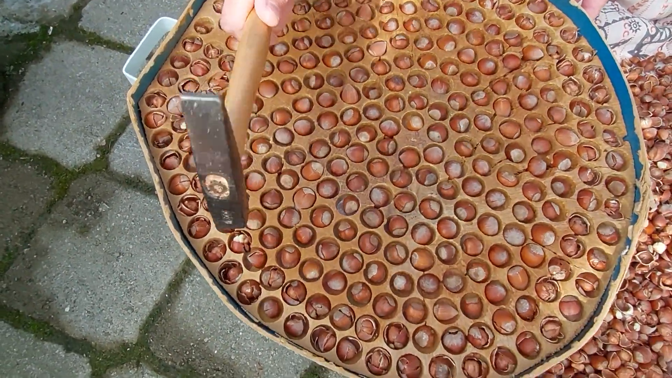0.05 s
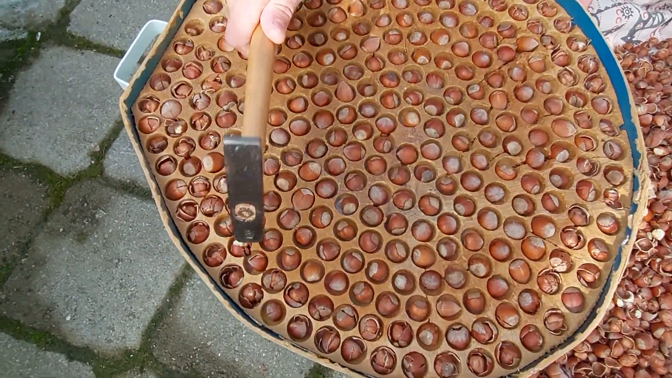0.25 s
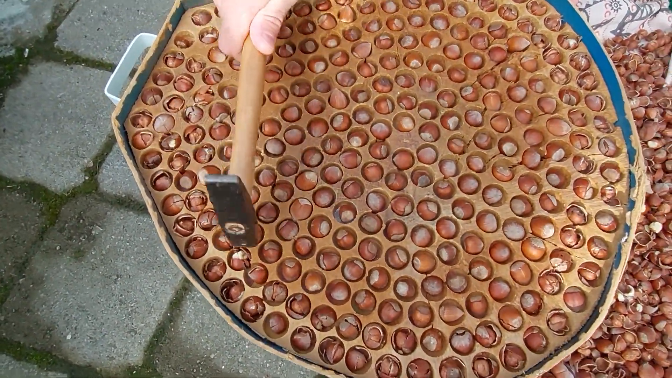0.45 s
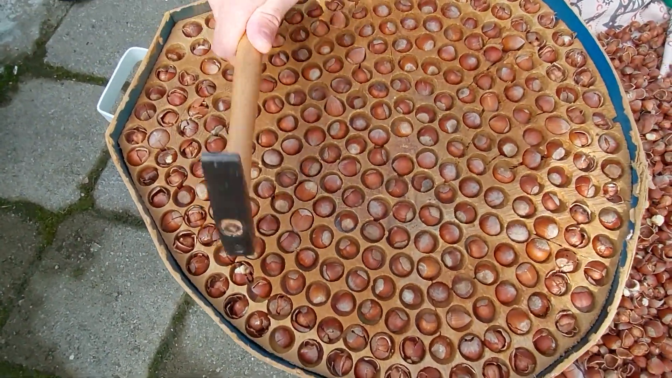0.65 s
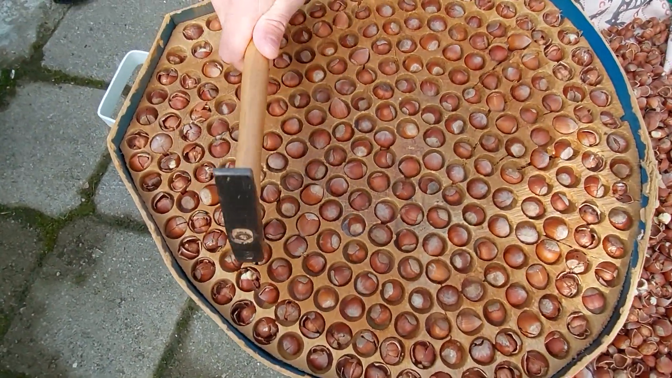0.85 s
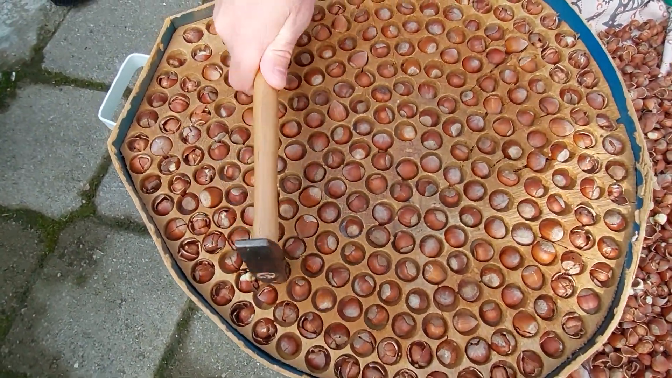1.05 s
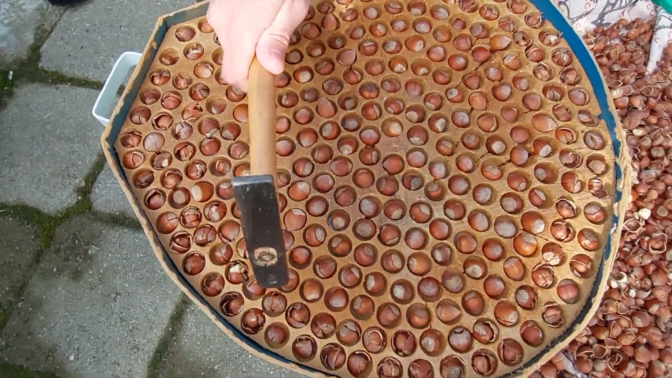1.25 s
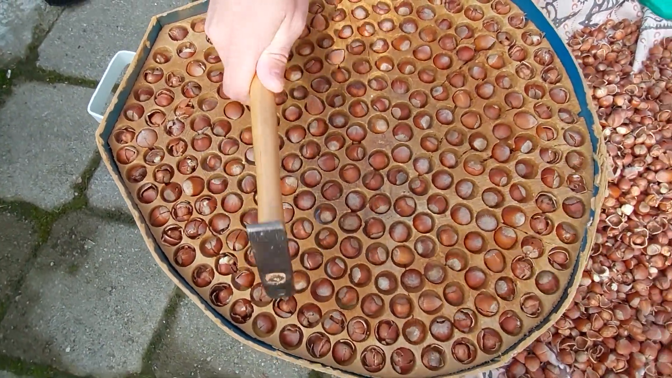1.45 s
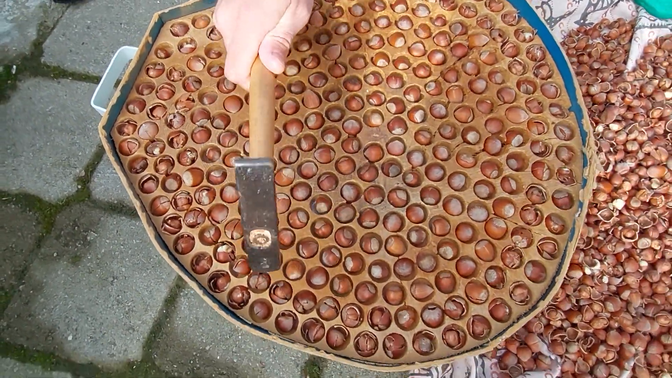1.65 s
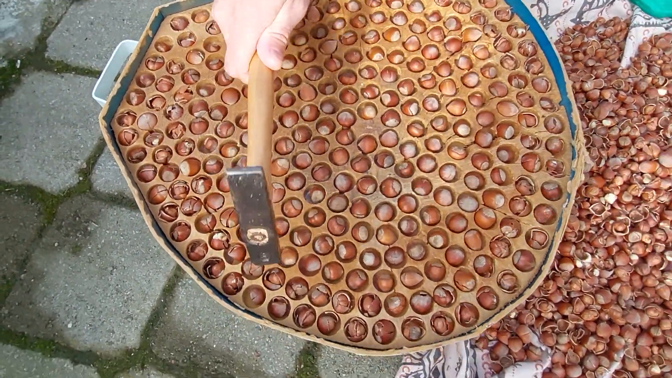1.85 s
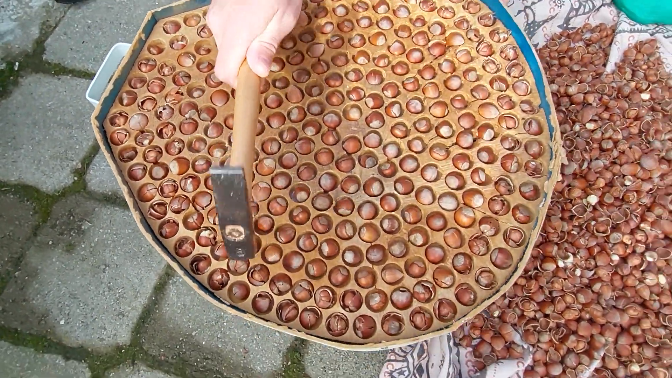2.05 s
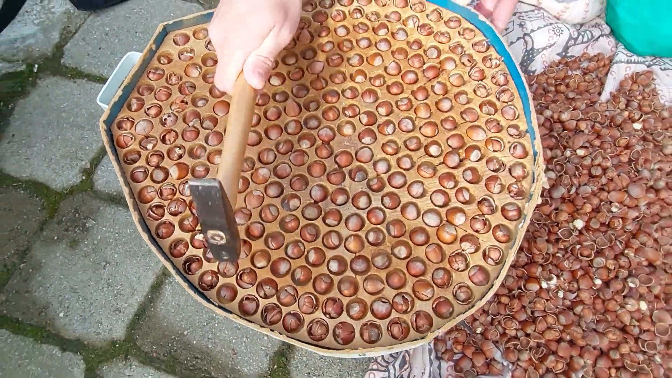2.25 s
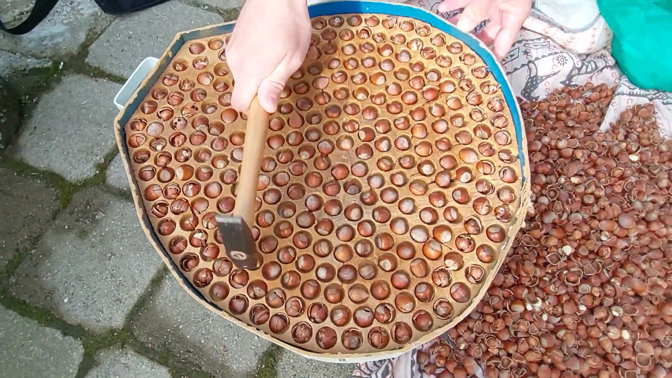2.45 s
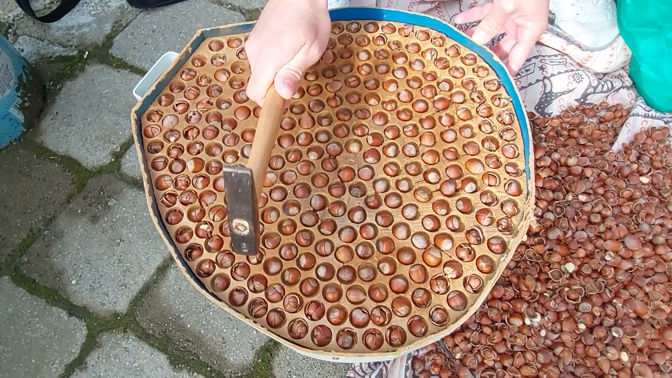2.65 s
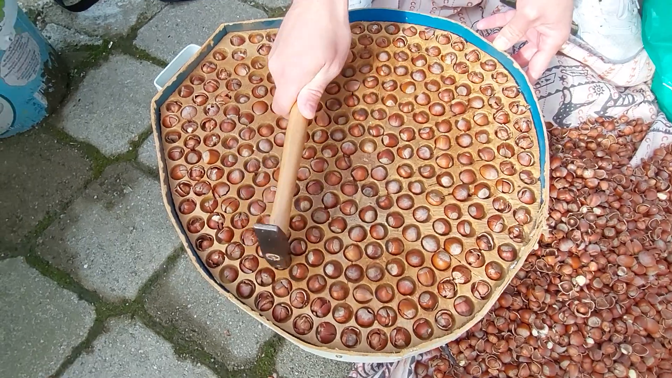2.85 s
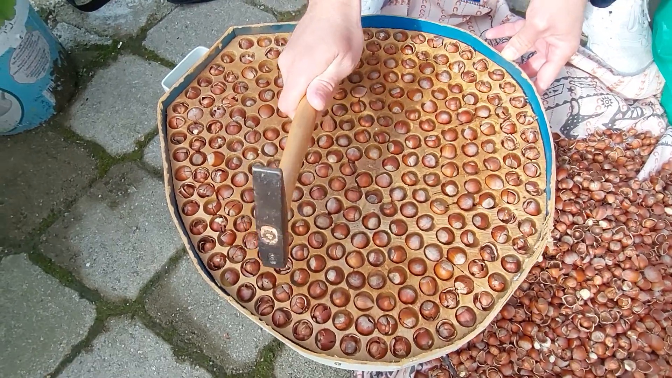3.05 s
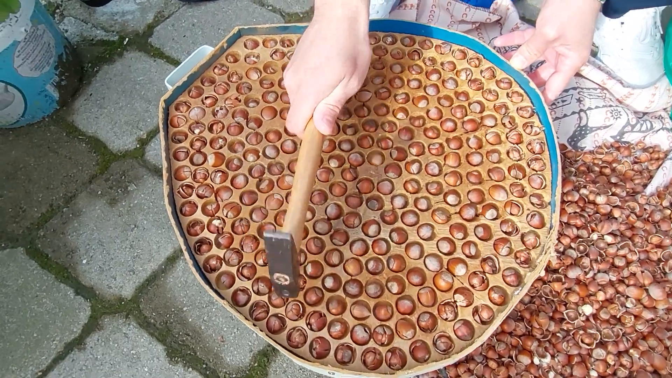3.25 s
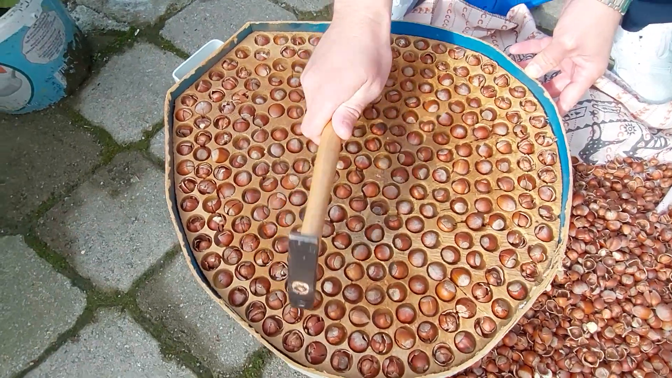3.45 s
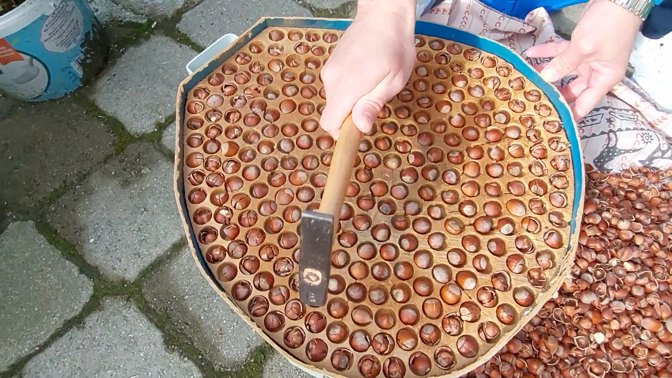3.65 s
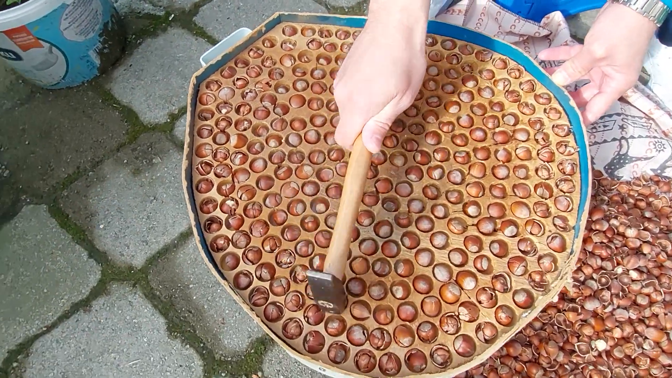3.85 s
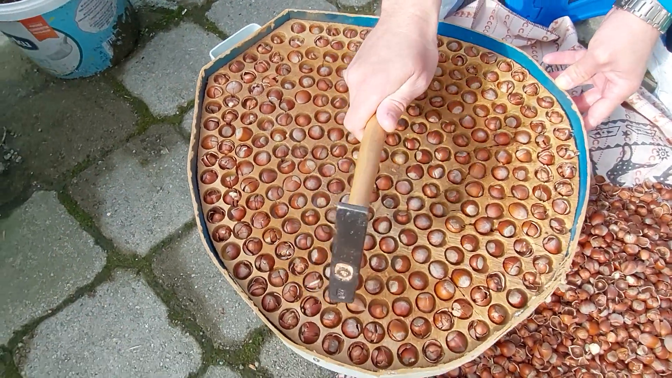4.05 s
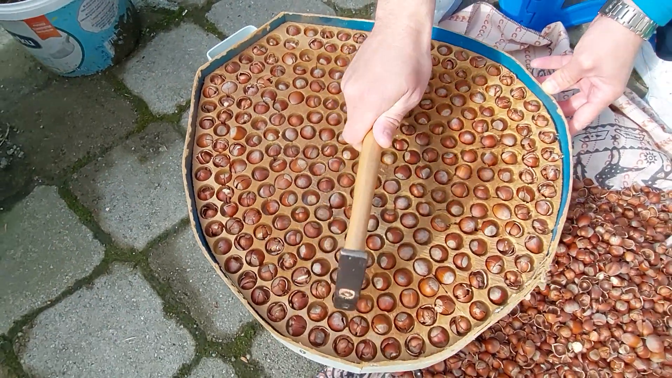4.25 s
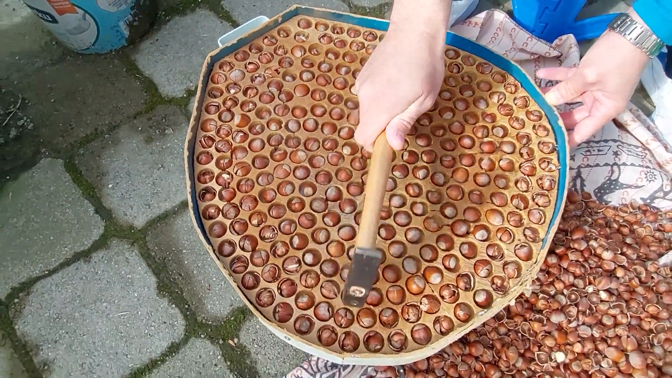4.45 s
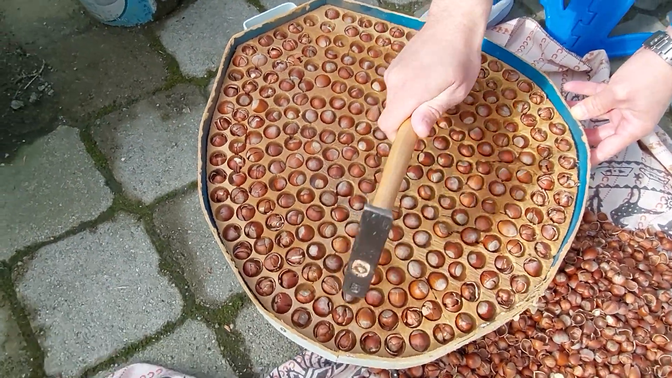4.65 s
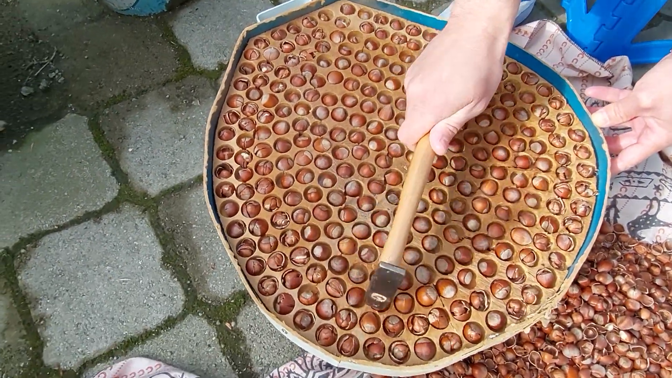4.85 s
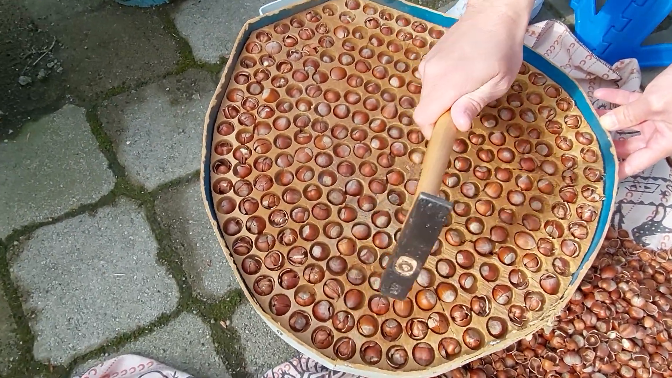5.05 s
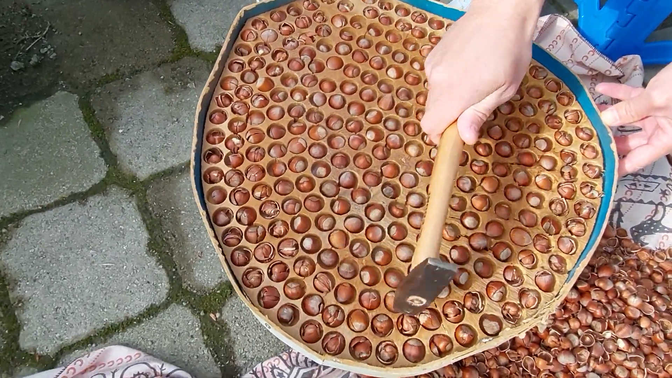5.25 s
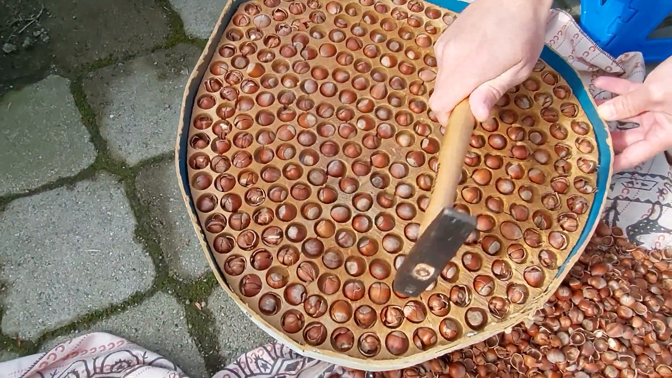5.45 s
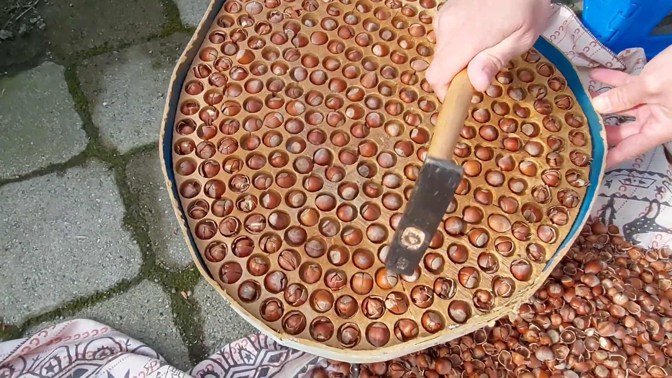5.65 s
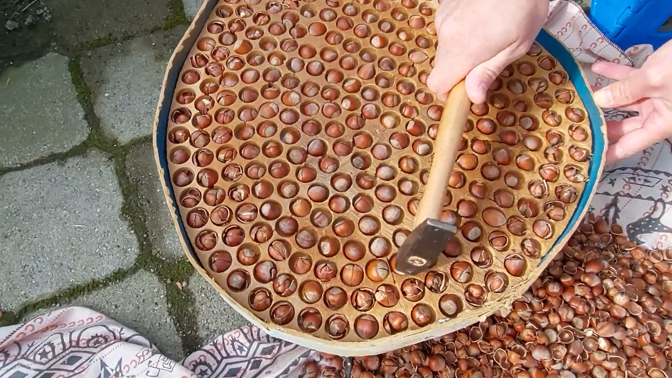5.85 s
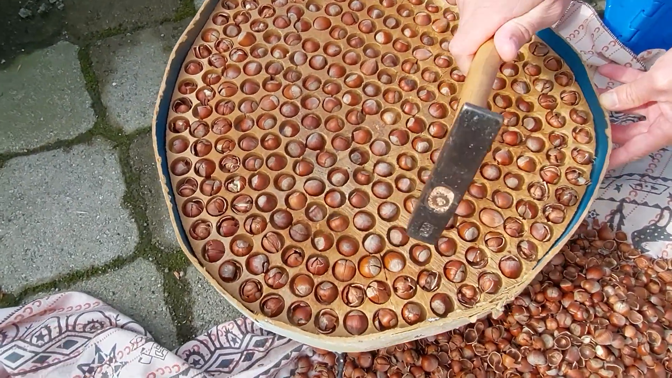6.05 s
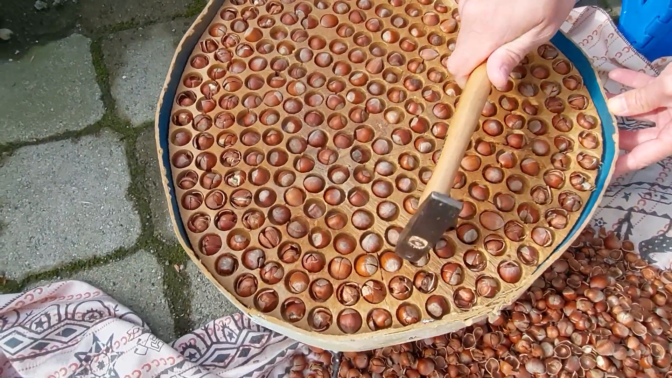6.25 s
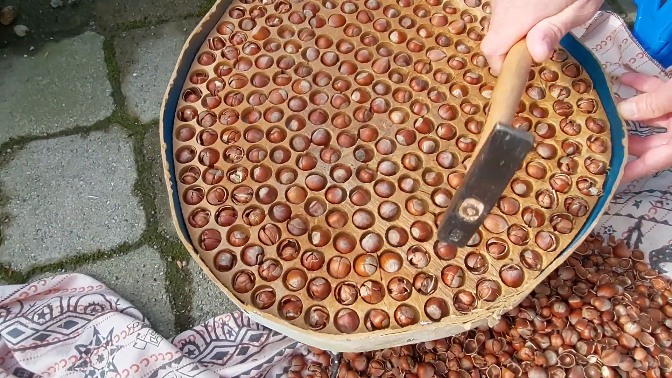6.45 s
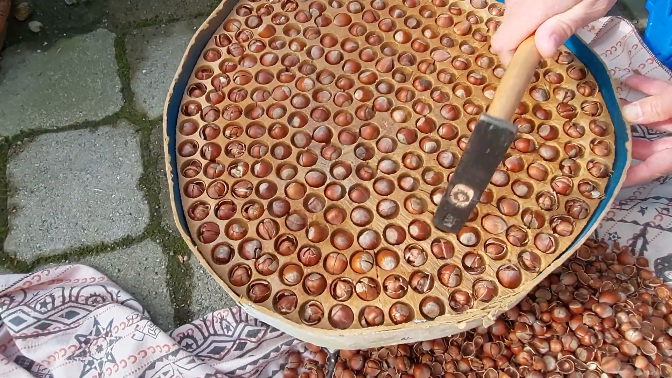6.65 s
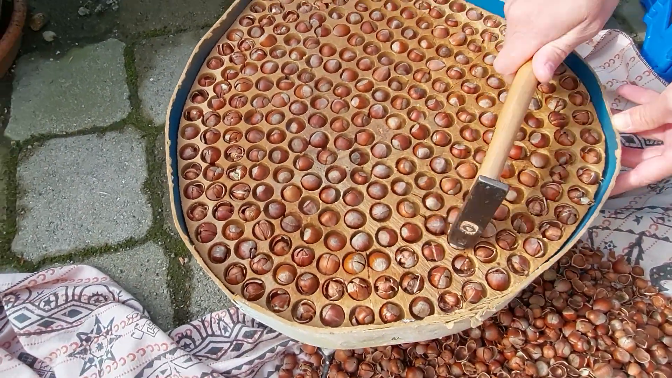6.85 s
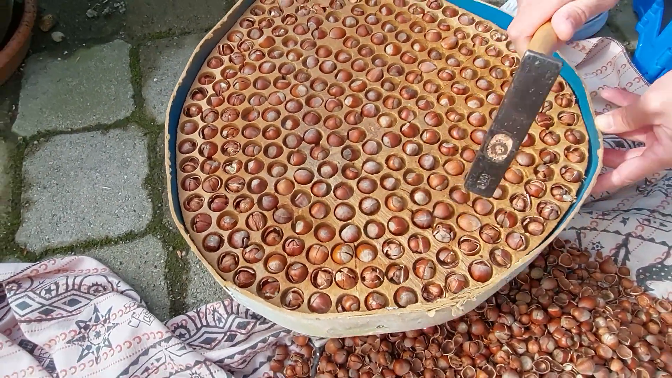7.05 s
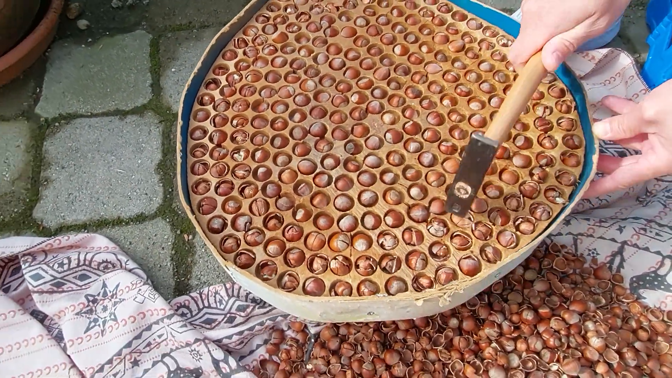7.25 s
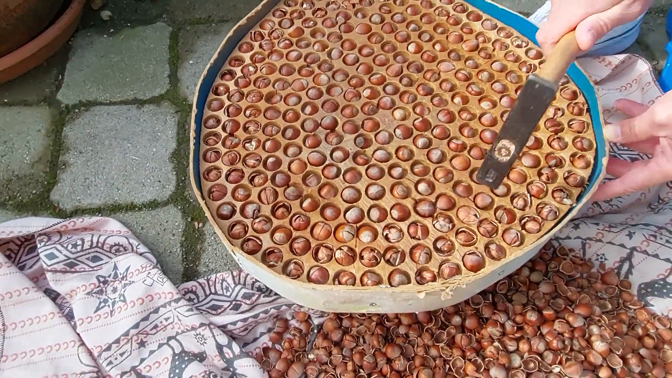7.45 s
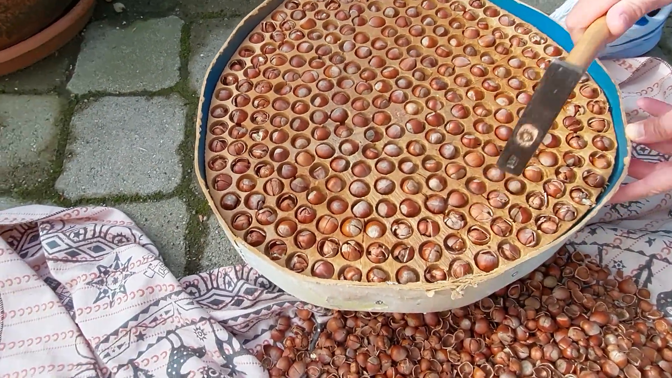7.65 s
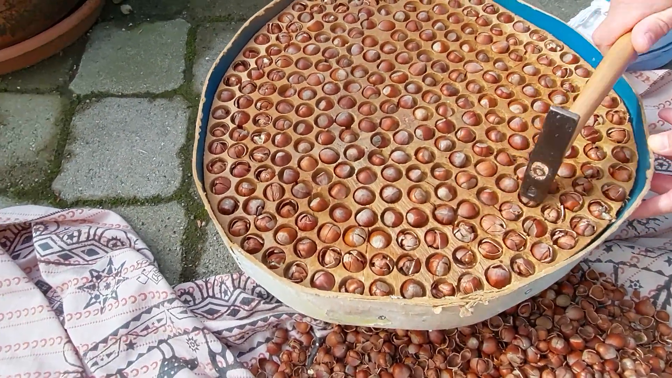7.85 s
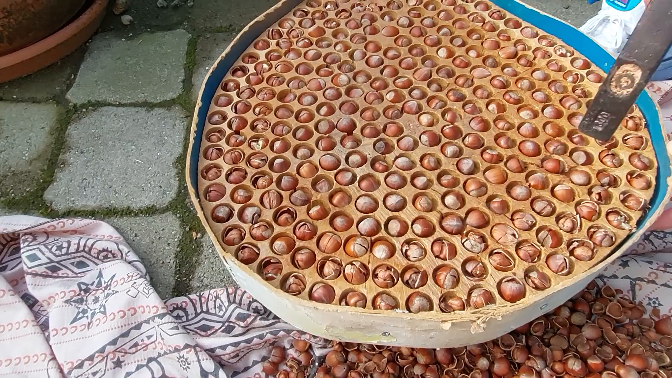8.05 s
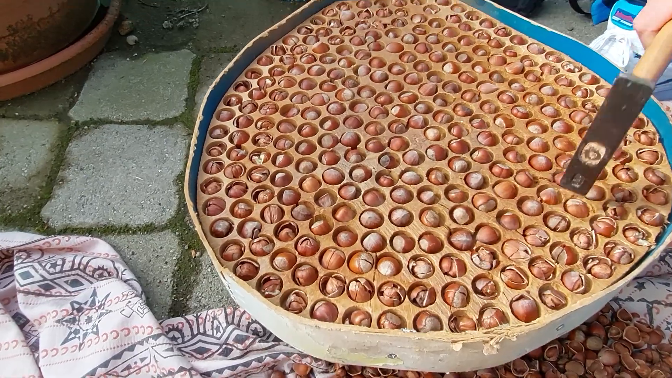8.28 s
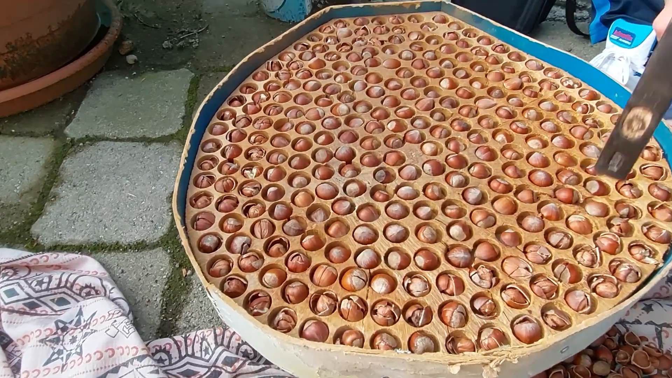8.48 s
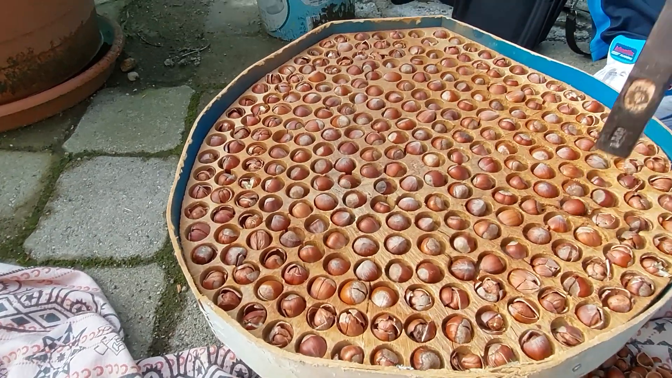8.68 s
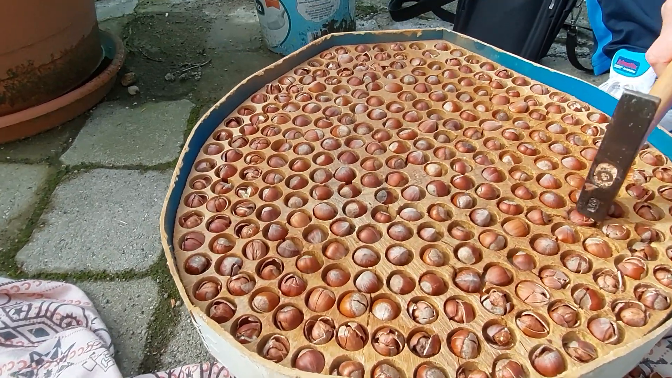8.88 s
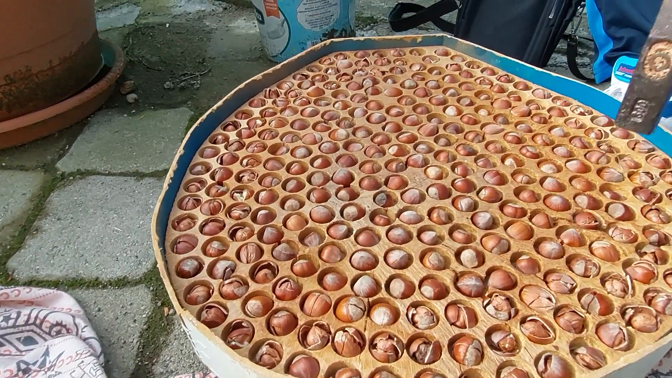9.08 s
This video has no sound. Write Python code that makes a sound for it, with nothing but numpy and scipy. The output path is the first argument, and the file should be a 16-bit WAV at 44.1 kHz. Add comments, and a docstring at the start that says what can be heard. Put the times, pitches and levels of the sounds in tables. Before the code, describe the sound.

Close up in a paved yard, a hammer breaks hazelnuts held in a wooden board on a plastic tub. A knock lands at 0 s, then a duller, softer one at 0.43 s with a tiny rebound. From 0.77 s sharp dry cracks follow about every third of a second until 8.95 s, varying in brightness; those at 1.4 and 1.8 s are more knocking. Each brings a short woody knock, a light rattle of neighbouring nuts and ticking crumbs. Deeper tub thumps show around 1.1, 5.6 and 5.9 s. Soft lumpy shoves of the tub occur near 0.1, 1.9, 2.5-3.3, 5-5.4 and 7.6-8 s. Extra shell ticks fall around 1.4-2.4 and 4 s. Short wall echoes answer, over faint hush, hiss and low rumble. Very faint distant squeaks sound at 0.5 and 1.4 s. The blows drift slightly rightward.

```python
"""Sharp cracks, about three a second: a steel hammer breaks hazelnuts in the holes of a wooden board on a plastic tub.
A shell breaks in two quick bursts of noise with its own resonance; damped modes knock the board and thump the tub.
The other nuts rattle as short damped notes, bits of shell tick, and shoves jostle the tub in soft, lumpy noise.
A paved yard answers close by with noise tails and smeared wall echoes.
Behind it lie a faint hush and hiss over a low rumble, and two thin squeaks far away."""
import sys
import numpy as np
from scipy import signal
from scipy.fft import rfft, irfft, next_fast_len
from scipy.io import wavfile
from scipy.ndimage import uniform_filter1d, map_coordinates

SR = 44100
rng = np.random.default_rng(int(sys.argv[2]) if len(sys.argv) > 2 else 0)


def to_wav(sig):
    """Store sig (one row per channel, or 1-D mono) as 16-bit WAV at the path in sys.argv[1].

    Samples outside -1..1 are clipped; the rate is SR.
    """
    pcm = np.clip(np.atleast_2d(sig), -1, 1) * 32767
    pcm = np.round(pcm).astype(np.int16)
    wavfile.write(sys.argv[1], SR, pcm.T)  # frames by channels


N = 402191

SIZE = 32768  # samples in one short sound
AGE = np.arange(SIZE) / SR  # s
HZ = np.fft.rfftfreq(SIZE, 1 / SR)
LEAD = 256 / SR  # s of room ahead of the blow in a short sound
WINDOW = .01  # s, reference length for the level of a short sound

# Hammer blows, and one light rebound at 0.4546 s, levels ahead of each layer's trim: (start_s, crack_db,
# body_db re crack, brightness_db re crack, shell_resonance_hz, board_knock_db, board_pitch_hz, tub_thump_db)
BLOWS = [(-0.014, -27, -1, 3, 5000, -15.5, 497, -37), (0.4298, -26, -16.5, -9, 7040, -18.5, 387, -44),
         (0.4546, -30, -22.5, -24.5, 5160, -31, 414, -49),
         (0.7725, -17.5, -10.5, -8, 3950, -24, 575, -36.5),
         (1.0993, -18, -7.5, -6.5, 7150, -25.5, 450, -17), (1.411, -24, -6, 0, 9900, -14, 396, -40),
         (1.7946, -24, -6.5, 1, 10160, -11, 392, -24), (2.1792, -16, -13, -3.5, 4390, -27.5, 493, -60.5),
         (2.545, -21, -8, -5, 4430, -39, 566, -44.5), (2.8923, -21.5, 3, -3, 4050, -21.5, 442, -39),
         (3.2285, -19.5, -9.5, -2, 4110, -32.5, 622, -38), (3.5668, -22.5, -6, -1, 4490, -25.5, 494, -52.5),
         (3.9091, -22, -8, -0.5, 4620, -31.5, 403, -41.5),
         (4.2343, -19.5, -10, -3.5, 4140, -30.5, 519, -41.5), (4.5522, -19, 2, -5, 4460, -16, 428, -51),
         (4.9083, -19.5, -12.5, -5.5, 3790, -30.5, 424, -40),
         (5.2471, -20, -5.5, -3, 6840, -31.5, 484, -34), (5.5676, -17, -7, -4, 3080, -28, 331.5, -17.5),
         (5.92, -19, -6, -2, 6060, -23.5, 330, -10), (6.2552, -19, -8.5, -5.5, 5630, -17.5, 454, -44),
         (6.5863, -19.5, -9, -4, 7540, -35.5, 472, -38.5),
         (6.9186, -21.5, -8.5, -2.5, 4560, -31, 554, -26.5), (7.2469, -21, -7.5, -4, 3860, -32.5, 635, -40),
         (7.5743, -19, -8, -5.5, 7420, -44.5, 379, -33), (7.9052, -20.5, -9.5, -5.5, 7140, -39.5, 542, -26),
         (8.25, -19.5, -2, -5.5, 3600, -18.5, 444, -38.5), (8.5985, -20, -9.5, -3, 3540, -27.5, 401, -41),
         (8.948, -18, -10.5, -7, 6180, -34, 365, -29)]
# Tone of shell fragments: (frequency_hz, gain_db)
CRUMB_COLOUR = [(300, -13), (1200, 5), (3000, 3), (5500, 5.5), (7300, -0.5), (8400, -10), (15500, -13.5)]


def hammer(crack_gain_db=-2.5, knock_gain_db=-1, thump_gain_db=-3, crumb_db=-21, radiated_db=2.5, knock_radiated_db=-4):
    """Most blows crack a shell and scatter crumbs, a few are soft knocks or a rebound; all knock board and tub."""
    second_s, second_scatter = .0021, 0.26  # delay of the second fracture, its relative scatter
    second_db, second_spread_db = -7.5, 2  # re the first fracture
    # A crack with more hollow body carries further into the yard
    throw_base_db, throw_per_body = 2, 0.2  # dB, dB per dB of body
    yard_fall_db_per_s = 0.13  # the yard's answer fades as the listening point moves round
    out = np.zeros((2, N))
    at_blow = np.exp(-2j * np.pi * HZ * LEAD)  # delays a sound to the moment of the blow
    chance = rng.standard_normal((len(BLOWS), 2))
    for blow, (late, strong) in zip(BLOWS, chance):
        s, crack_db, body_db, bright_db, shell_hz, knock_db, pitch_hz, thump_db = blow
        tone = amp(crack_db + crack_gain_db) * shell(body_db, bright_db)
        shell_ring = resonance(shell_hz, width_hz=340, db=3.5)
        fractures = snap(second_s * np.exp(second_scatter * late), second_db + second_spread_db * strong)
        crack = tone * fractures * causal(shell_ring)
        scatter = tone * amp(crumb_db) * at_blow * crumbs(count=12, mean_s=0.018, t60=.7)
        knock = -amp(knock_db + knock_gain_db) * rfft(board(pitch_hz)) * low_cut(hz=253)
        radiated = amp(radiated_db) * tone * at_blow + amp(knock_radiated_db) * knock
        throw_db = throw_base_db + throw_per_body * body_db - yard_fall_db_per_s * s
        add(out, s, in_yard(placed(s, crack + scatter + knock), radiated, throw_db))
        add(out, s, amp(thump_db + thump_gain_db) * tub())
    return out


def snap(second_s, second_db):
    """The spectrum of two quick fractures: even overall, with each shell's own peaks and dips."""
    x = rfft(fracture(0) + amp(second_db) * fracture(second_s))
    ripple_db = 3 * map_coordinates(rng.standard_normal(80), [HZ / 350], mode="mirror")
    x = x * causal(amp(ripple_db))
    trend = uniform_filter1d(np.mean(np.abs(x) ** 2, 0), size=2400)
    # dividing by the broad trend leaves only the fine structure
    return x * causal(1 / np.sqrt(np.abs(trend) + 1e-12))


def fracture(after, splinter_db=-13):
    """One break of a shell: a sharp noise spike, then a few milliseconds of splintering."""
    spike = pair(0.5, SIZE) * strike(rise=0.0023, t60=0.0032, after=after)
    splinters = pair(0.6, SIZE) * strike(rise=0.0066, t60=0.02, after=after)
    return spike + amp(splinter_db) * splinters


def shell(body_db, bright_db):
    """The tone of one nut: a hollow body and a bright edge, each balanced against the middle band."""
    # Crack tone ahead of the balance: (frequency_hz, gain_db)
    crack_colour = [(100, -14.5), (400, 6.5), (800, 7), (1400, 4), (2200, 2.5), (4000, 4), (6000, 4),
                    (7500, 6.5), (8300, -14), (11000, -10.5), (15500, -12.5), (17000, -27.5)]
    colour = amp(along(crack_colour, HZ))
    power = colour ** 2 * 2 / (SIZE * WINDOW * SR)

    def band_db(low_hz, high_hz):
        return 10 * np.log10(power[(HZ > low_hz) & (HZ < high_hz)].sum())

    body = body_db - band_db(750, 2000)
    middle = -band_db(2000, 7800)
    top = bright_db - band_db(8000, 16000)
    balance = [(1900, body), (3000, middle), (7600, middle), (8300, top)]
    return causal(colour * amp(along(balance, HZ)))


def crumbs(count, mean_s, t60):
    """The spectrum of shell crumbs that scatter over the board: short noise grains at random waits."""
    wait, size = rng.exponential(size=(2, count))
    when = np.clip(0.01 + mean_s * wait, 0, .5)
    kick_db = 6 * np.minimum(size, 3) - 60 * when / t60
    kicks = np.bincount((when * SR).astype(int), amp(kick_db), SIZE)
    grain = pair(0.9, SIZE) * amp(-60 * AGE / 0.011)
    kicks_spectrum = rfft(kicks / np.linalg.norm(kicks))
    grain_spectrum = rfft(grain / np.linalg.norm(grain[0]))
    return kicks_spectrum * grain_spectrum * amp(along(CRUMB_COLOUR, HZ))


def board(pitch_hz):
    """The board's knock: damped modes, with new strengths and slight detuning at every spot."""
    # Modes of the board: (multiple_of_pitch, level_db, t60_s)
    modes = [(.64, -29, 0.1), (0.782, -13, 0.039), (.92, 0.5, 0.041), (1.0, 15, 0.05), (1.163, -1, 0.11),
             (1.399, -13.5, 0.08), (1.6, -1, 0.096), (1.801, -8, 0.076), (2.148, -11.5, 0.1),
             (2.748, -14.5, 0.087), (4.202, -11, 0.1)]
    chance = rng.standard_normal((len(modes), 2))
    knock = 0
    for (multiple, db, t60), (strong, sharp) in zip(modes, chance):
        knock = knock + amp(db + 2 * strong) * ring(pitch_hz * multiple * (1 + 0.032 * sharp), t60)
    return burst(knock)


def tub(hz=59, t60=0.093, push_db=0):
    """The tub gives under the board: one dull push and a short boom that reaches the ears out of step."""
    boom = rfft(ring(hz, t60) + amp(push_db) * ring(hz=95, t60=0.021))
    skew = np.exp(1j * np.array([[.5], [-.5]]) * rng.standard_normal())
    return burst(irfft(boom * skew * low_cut(hz=42)))


def placed(s, spectrum):
    """A spectrum as the two ears get it from the hammer, which works its way from left to right."""
    # Hammer position: (time_s, right_ear_lead_ms, left_minus_right_db)
    place = [(0, -.13, 0), (2.9, -.08, 0), (4.5, -.03, -.3), (6, .05, -.6), (7.2, .14, -1.6),
             (9.1, .17, -1.6)]
    times, leads, pans = np.transpose(place)
    lead_s = np.interp(s, times, leads) / 1000
    pan_db = np.interp(s, times, pans)
    ears = np.array([[.5], [-.5]])
    return spectrum * amp(ears * pan_db) * np.exp(-2j * np.pi * HZ * ears * lead_s)


def rattle(count=9, flight_s=0.093, flight_scatter=0.33, db=-20, spread_db=3, fade_db_per_s=75,
           pitch_hz=4000, t60=0.015, click_db=-6):
    """Each blow or rebound makes the nuts jump in their holes; they drop back with small ticks, late ones softer."""
    rattle_fall_db_per_s = 1.43  # less rattle as the hammer nears the rim that a hand steadies
    out = np.zeros((2, N))
    t = AGE[:1024]
    for s, crack_db, *_ in BLOWS:
        jump_db = crack_db + db - rattle_fall_db_per_s * s
        for late, size, pitch, side in rng.standard_normal((count, 4)):
            flight = flight_s * np.exp(flight_scatter * late)
            note_hz = pitch_hz * np.exp(.13 * pitch)
            note = np.sin(2 * np.pi * note_hz * t) * amp(-60 * t / t60)
            click = amp(click_db - 60 * t / .012) * pair(.5, len(t))
            pan_db = side * np.array([[2], [-2]])
            level_db = jump_db + spread_db * size - fade_db_per_s * flight + pan_db
            # these sounds have no lead, so LEAD is added back
            add(out, min(s + LEAD + flight, N / SR), amp(level_db) * (note + click))
    return out


def bits(tick_db=-3, tap_db=-11):
    """Larger bits of shell and light hammer touches: a resonant noise tick and a light tap of the board's modes."""
    # Levels ahead of the two trims: (start_s, level_db, pitch_hz, low_knock_db re level)
    landings = [(1.424, -27.5, 4700, -19), (1.809, -27, 6000, -15), (1.8396, -34.5, 5400, 7),
                (1.8842, -43.5, 5600, 9), (2.4061, -48.5, 2650, 23), (3.9393, -36.5, 4060, 0.5),
                (4.0487, -42.5, 5650, 4.5), (4.0757, -32.5, 2880, -14.5), (4.283, -38, 5360, -32.5),
                (8.6348, -38.5, 5440, 6.5)]
    out = np.zeros((2, N))
    for s, db, hz, low_db in landings:
        colour = causal(amp(along(CRUMB_COLOUR, HZ)) * resonance(hz, width_hz=850, db=-3.5))
        noise = pair(0.15, SIZE) * strike(rise=.004, t60=0.073)
        tick = burst(irfft(rfft(noise) * colour))
        sound = rfft(tick + amp(low_db + tap_db) * board(pitch_hz=535))
        add(out, s, amp(db + tick_db) * in_yard(sound, sound))
    return out


def jostle(attack_s=.1, release_s=.14, lumps_per_s=30, lump_db=2.5, gain_db=0):
    """The tub shifts: low noise swells, holds and dies away with each shove, in soft, uneven bumps."""
    # Shoves, with attack_s and release_s the times of a 60 dB rise and fall: (start_s, length_s, level_db)
    shoves = [(0.068, 0.012, -34), (1.877, .12, -46.5), (2.52, 0.19, -43.5), (2.843, 0.25, -40),
              (3.267, 0.038, -46.5), (5.02, 0.345, -45), (7.589, 0.018, -35.5), (7.934, 0.099, -40)]
    boom_colour = [(20, -43.0), (50, -4.0), (80, 0), (120, -8.0), (200, -23), (500, -26.5), (2000, -72.5)]  # Hz, dB
    t = np.arange(N) / SR
    swell = 0
    for s, length, db in shoves:
        outside = np.maximum((s - t) / attack_s, (t - s - length) / release_s)
        swell = swell + amp(db - 60 * np.maximum(outside, 0))
    boom = filtered(pair(0.3, N), lambda hz: amp(along(boom_colour, hz)))
    return amp(gain_db + lump_db * waver(lumps_per_s)) * swell * unit(boom)


def in_yard(direct, radiated, throw_db=0, near_db=-13.5, yard_db=-24.5):
    """The direct sound, plus what is radiated all round: scatter from tub and paving, the yard's tail, its echoes."""
    # Decay times: (frequency_hz, t60_s)
    near_t60 = [(200, 0.22), (800, 0.12), (3000, 0.094), (8000, 0.093), (15000, 0.06)]
    yard_t60 = [(200, 1), (1000, 0.41), (4000, 0.76), (8000, 0.61), (15000, 0.37)]
    # Tones of the near scatter and of the yard's tail: (frequency_hz, gain_db)
    near_colour = [(150, 12), (500, 4.5), (1000, 4.5), (2000, 2.5), (4000, 1.5), (7400, -10.5), (8300, -14),
                   (15500, -1)]
    yard_colour = [(150, -6.5), (600, -2), (2000, 2.5), (4000, -4), (7400, -8.5), (8300, -6), (15500, -2)]
    near = amp(near_db) * tail(near_t60, near_colour, onset=0.0021)
    # the houses stand some way off, so their answer swells late
    far = amp(yard_db) * tail(yard_t60, yard_colour, onset=0.037) + walls()
    return irfft(direct + radiated * (near + amp(throw_db) * far))


def tail(t60s, colour, onset):
    """A diffuse stereo tail: noise that builds up over onset seconds and decays at its own rate in each band."""
    hz, t, z = signal.stft(rng.standard_normal((2, SIZE)), SR, nperseg=256)
    decay = amp(-60 * t / along(t60s, hz)[:, None])
    x = signal.istft(z * decay, SR, nperseg=256)[1][:, :SIZE]
    x = x * (1 - np.exp(-(AGE / onset) ** 2))
    return rfft(x / np.linalg.norm(x[0])) * amp(along(colour, HZ))


def walls(smear=0.0043):
    """The response of the yard's walls: each echo is noise, smeared over smear seconds by a rough face."""
    # Echoes: (delay_s, level_db)
    echoes = [(.048, -29.5), (.064, -38), (0.078, -31.5), (0.084, -36.5), (.123, -37), (0.152, -34.5),
              (0.221, -39.5)]
    # Tone of the echoes: (frequency_hz, gain_db)
    wall_colour = [(300, -16), (1700, -11), (2700, -2), (3800, 1), (5000, -7), (7400, -7), (8500, -18),
                   (15500, -18)]
    shape = sum(amp(db) * np.exp(-np.abs(AGE - delay) / smear) for delay, db in echoes)
    noise = rng.standard_normal((2, SIZE)) * shape / np.sqrt(smear * SR)
    return rfft(noise) * amp(along(wall_colour, HZ))


def squeaks():
    """Faint, wavering squeaks of something far away: narrow noise bands that swell and fade."""
    # Squeaks: (centre_s, length_s to 1/e on either side, pitch_hz, level_db)
    calls = [(0.513, .05, 2210, -65), (1.37, 0.033, 2154, -61)]
    t = np.arange(N) / SR

    def thin(pitch_hz):
        return unit(filtered(pair(.5, N), lambda hz: np.exp(-((hz - pitch_hz) / 70) ** 2)))

    return sum(amp(db) * np.exp(-((t - s) / length) ** 2) * thin(hz) for s, length, hz, db in calls)


def background(rumble_db=-3, hush_db=0, hiss_db=-12, rumble_grows=2.3, waver_db=2):
    """Outdoor hush and hiss over a low rumble: one level drives all three, the rumble most, and each wavers."""
    # Common level: (time_s, level_db)
    air = [(0.2, -60), (1.41, -61.5), (3.15, -56), (3.33, -60), (4.03, -57.5), (8.9, -58)]
    # Noise shapes: (frequency_hz, density_db per Hz, relative)
    rumble_shape = [(15, -37.5), (35, -15.5), (65, 4.5), (100, 4.5), (170, -13), (300, -25.5), (700, -61)]
    hush_shape = [(150, -9), (280, 1), (500, 3), (900, -6), (1500, -11), (2400, -13.5), (3500, -25),
                  (8000, -41)]
    hiss_shape = [(1200, -12.5), (2500, -3.5), (4000, -0.5), (5500, -8.5), (7500, -11.5), (8300, -24.5),
                  (11000, -20), (15500, -36)]
    level_db = np.interp(np.arange(N) / SR, *np.transpose(air))
    swell_db = level_db - level_db.mean()

    def noise(shape, alike):
        return unit(filtered(pair(alike, N), lambda hz: amp(along(shape, hz))))

    rumble = amp(rumble_db + rumble_grows * swell_db + 3 * waver(5.6)) * noise(rumble_shape, 0.18)
    hush = amp(hush_db + swell_db + waver_db * waver(7.9)) * noise(hush_shape, 0.23)
    hiss = amp(hiss_db + swell_db + 0.9 * waver(6)) * noise(hiss_shape, 0.17)
    return amp(level_db.mean()) * (rumble + hush + hiss)


def amp(db):
    """Decibels to gain."""
    return np.exp(np.maximum(db, -300) * np.log(10) / 20)


def unit(x):
    """x at rms 1."""
    return x / np.sqrt(np.mean(x ** 2) + 1e-20)


def burst(x):
    """A short sound scaled as if all its energy made rms 1 over WINDOW seconds."""
    energy = np.mean(np.sum(x ** 2, -1))
    return x / np.sqrt(energy / (WINDOW * SR) + 1e-20)


def along(points, hz):
    """(Hz, value) points joined on a log frequency axis."""
    f, v = np.transpose(points)
    return np.interp(np.log(hz + 1), np.log(f + 1), v)


def causal(gain):
    """The minimum-phase response with this gain: it rings only after it is struck."""
    cepstrum = irfft(np.log(np.maximum(gain, 1e-6)))
    cepstrum[1:SIZE // 2] *= 2
    cepstrum[SIZE // 2 + 1:] = 0
    return np.exp(rfft(cepstrum))


def filtered(x, gain):
    """A whole track times a gain of frequency."""
    m = next_fast_len(N + SIZE)
    return irfft(rfft(x, m) * gain(np.fft.rfftfreq(m, 1 / SR)), m)[..., :N]


def add(track, s, sound):
    """Mix in a sound whose onset, LEAD into it, falls at time s."""
    start = round((s - LEAD) * SR)
    a, b = max(start, 0), min(start + sound.shape[-1], N)
    track[:, a:b] += sound[..., a - start:b - start]


def strike(rise, t60, after=0):
    """An envelope that climbs 60 dB in rise seconds and falls 60 dB in t60, its peak after seconds past the blow."""
    t = AGE - LEAD - after
    return amp(-60 * np.maximum(-t / rise, t / t60))


def ring(hz, t60):
    """A damped mode that starts at the blow."""
    t = np.maximum(AGE - LEAD, 0)
    return np.sin(2 * np.pi * hz * t) * amp(-60 * t / t60)


def resonance(hz, width_hz, db):
    """The gain of a resonant bump on top of a flat response."""
    return 1 + amp(db) / np.sqrt(1 + (2 * (HZ - hz) / width_hz) ** 2)


def low_cut(hz):
    """A small body radiates little below this frequency: a two-pole high-pass."""
    return (1j * HZ / (hz + 1j * HZ)) ** 2


def pair(alike, size):
    """Two noises with the given correlation, from one shared noise and two of their own."""
    own = rng.standard_normal((3, size))
    alike = np.clip(alike, 0, 1)
    return np.sqrt(alike) * own[0] + np.sqrt(1 - alike) * own[1:]


def waver(rate):
    """A smooth random curve, rate knots a second."""
    return map_coordinates(rng.standard_normal(400), [np.arange(N) / SR * rate], mode="mirror")


def scene():
    """Everything as it reaches the two ears."""
    return hammer() + bits() + rattle() + jostle() + background() + squeaks()


def record(dry):
    """The sharpest peaks are rounded off towards 0.9 of full scale; a steep low-pass closes the top."""
    top_hz = 16300
    rounded = dry / (1 + (dry / .9) ** 4) ** (1 / 4)
    return filtered(rounded, lambda hz: 1 / (1 + (hz / top_hz) ** 120))


dry = scene()
out = record(dry)
to_wav(out)
```